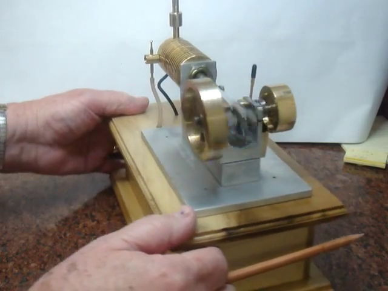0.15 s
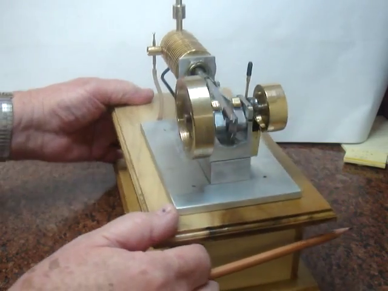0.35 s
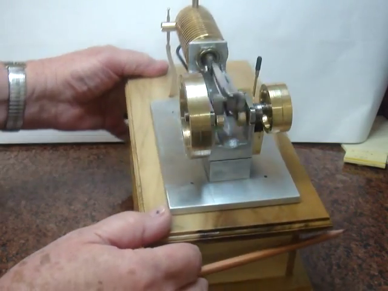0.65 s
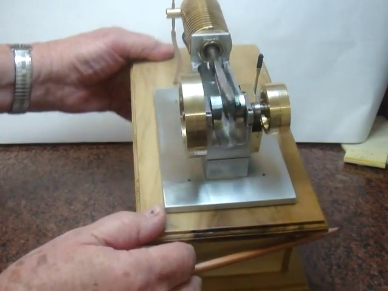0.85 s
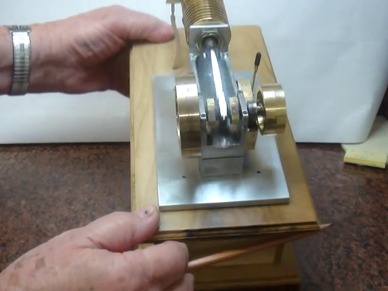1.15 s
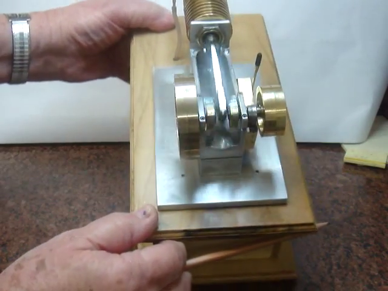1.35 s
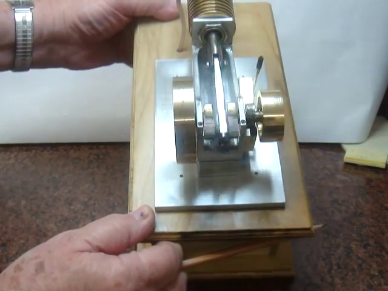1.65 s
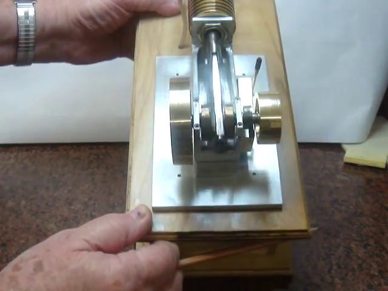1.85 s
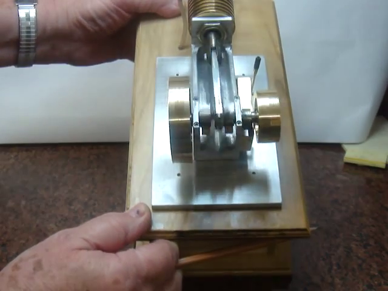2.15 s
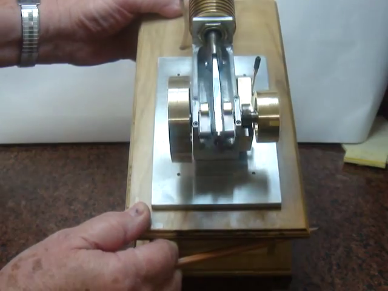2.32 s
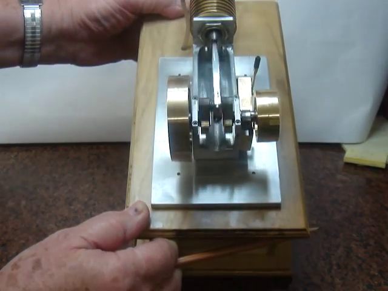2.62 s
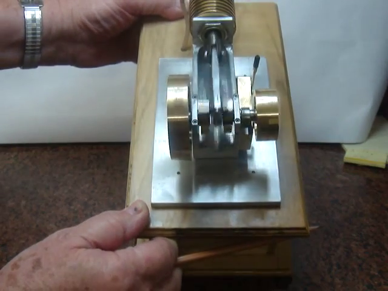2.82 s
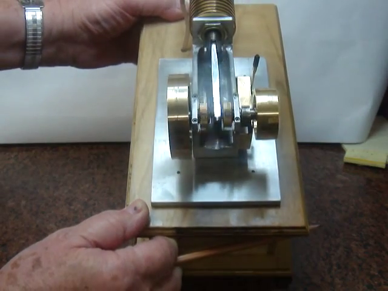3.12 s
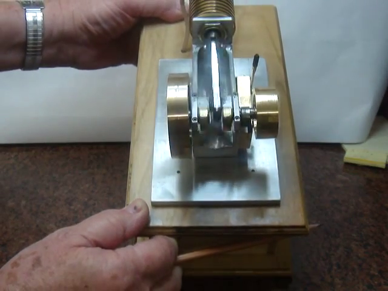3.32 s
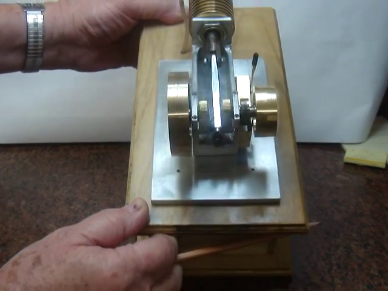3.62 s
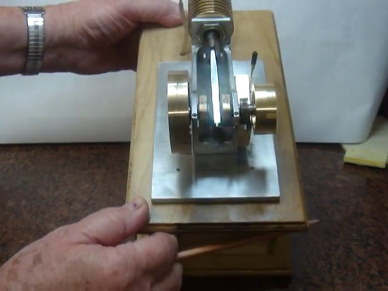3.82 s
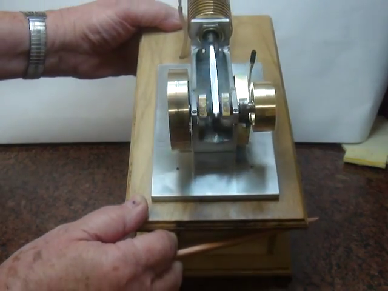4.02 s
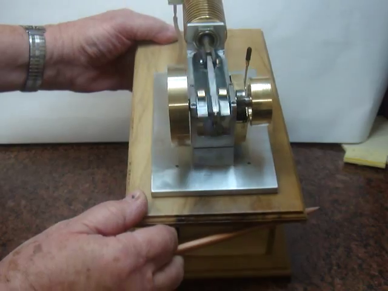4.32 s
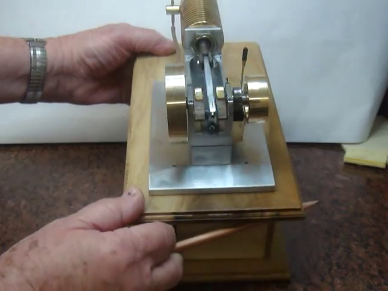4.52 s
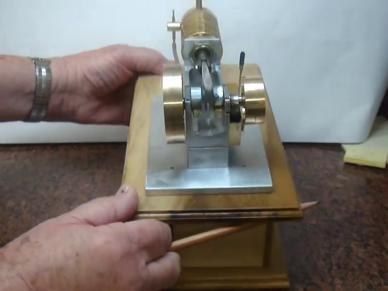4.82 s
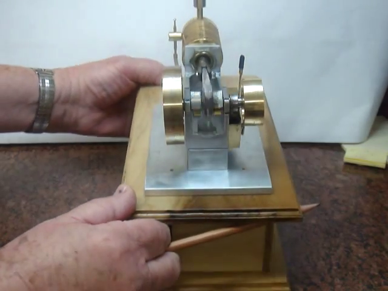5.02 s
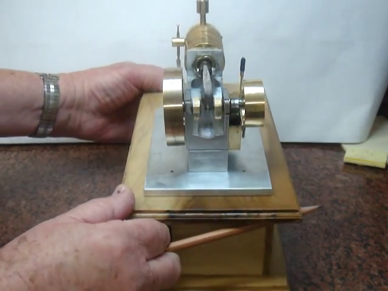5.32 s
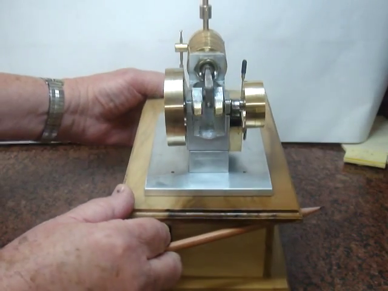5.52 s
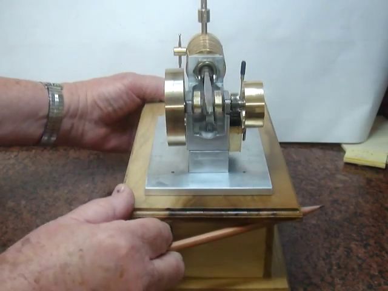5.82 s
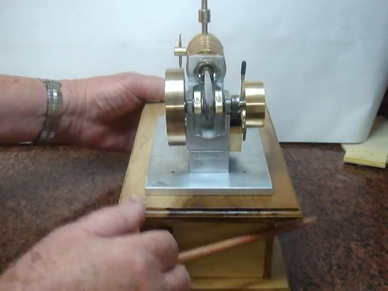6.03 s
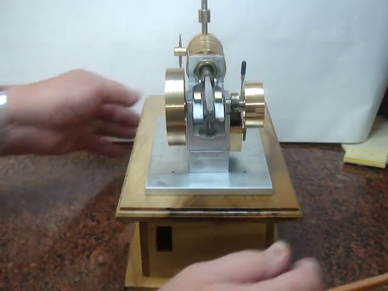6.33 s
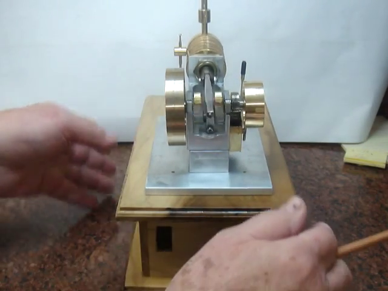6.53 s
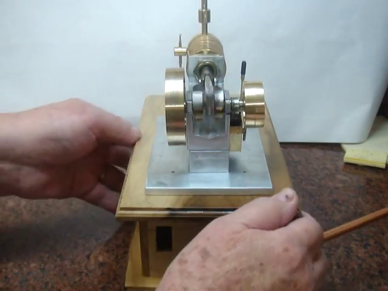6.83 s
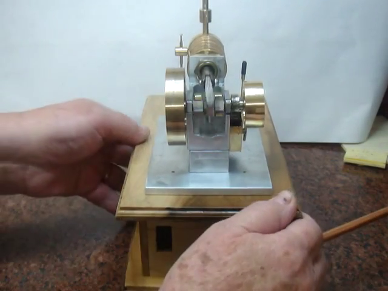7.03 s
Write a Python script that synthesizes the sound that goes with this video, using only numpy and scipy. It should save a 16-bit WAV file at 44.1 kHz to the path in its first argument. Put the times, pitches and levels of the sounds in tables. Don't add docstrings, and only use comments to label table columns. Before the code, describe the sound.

From 0 to about 7 seconds a small electromagnetic engine runs without pause on a hollow wooden box, turning every 0.22 seconds. Each turn repeats a pattern: a faint switch tick, a snap as it closes, a slack click with a woody push, a rattle and bump, then the loudest sound, a double metallic crack with a bright rebound and box knock, followed by lighter wrist and release clicks. All are short and dry, slightly uneven. At 0-1 s the box rubs softly on the table and the crack is strong. From about 1-4.3 s, tipped forward, clicks become brighter, slack looser and pin snaps clearer, with stronger wooden bumps near 1.8-2.7 s. From 4.5 s it settles back, rubbing slightly more; tiny stray knocks at 4.6 and 5.7 s. After 6.2 s it sounds duller and woodier. Low room noise and very faint hum persist; the microphone is close, with little bass.

```python
import sys
import numpy as np
from scipy import signal
from scipy.fft import rfft, irfft
from scipy.io import wavfile
from scipy.ndimage import uniform_filter1d

SR = 44100
rng = np.random.default_rng(int(sys.argv[2]) if len(sys.argv) > 2 else 0)


def amp(db):
    return 10 ** (np.asarray(db, float) / 20)


def write(x):
    x = np.atleast_2d(x).T
    wavfile.write(sys.argv[1], SR, np.round(np.clip(x, -1, 1) * 32767).astype(np.int16))

luck = rng.spawn(1)[0]


N = 315752
RING_SAMPLES = 6600
UNEVEN_DB = 0.4
SLACK_GROWS_MS = 2.8

# pitch in Hz, level in dB.
SLACK_TONE = [(700, -0.5), (1500, 1), (2300, 4.5), (3300, -3), (4200, -0.5), (5500, -13.5), (8000, -15),
              (10500, -20.5)]
# pitch in Hz, level in dB.
RELEASE_TONE = [(700, 0.5), (1500, -7), (2300, 6.5), (3300, 0), (5000, -1.5), (6200, -6), (8000, -4.5),
                (10500, -13)]


def turns(count):
    # time in seconds,
    # share of crank side shown, share tipped forward, lead of the rocking in ms, piston bump in dB.
    crank = [(0.0638, -0.035, 0.097, 45.5, -16.5), (0.4958, 0.45, 0.035, 40.5, -17),
             (0.9243, 0.86, 0.27, 34.5, -24), (1.3578, 0.88, 0.75, 18.5, -26), (1.793, 0.58, 0.66, -6, -12),
             (2.2321, 0.76, 0.78, 0.5, -14.5), (2.67, 0.7, 0.96, 4.5, -12.5),
             (3.1136, 0.72, 0.88, 13, -28.5), (3.5574, 0.87, 0.85, 17.5, -24),
             (4.0037, 0.96, 0.76, 22.5, -18), (4.4558, 0.5, 0.36, 31.5, -19.5),
             (4.903, -0.027, 0.066, 37, -28), (5.346, 0.17, 0.11, 42, -28),
             (5.7916, 0.045, 0.39, 43.5, -21), (6.2418, 0.0064, 0.37, 46.5, -23),
             (6.6946, -0.19, 0.42, 48.5, -29), (7.1476, -.4, 0.14, 46.5, -19.5)]
    rows = np.arange(len(crank))
    every_turn = np.arange(2 * len(crank) - 1) / 2
    seconds, *controls = [np.interp(every_turn, rows, column) for column in np.transpose(crank)]
    return [column[:count] for column in (seconds, np.gradient(seconds), *controls)]


def contact(name, count=32):
    contacts = {"lift": (-37, -32, 5, -7, 0.8), "close": (0.0, -23, 1, 2, -0.15),
                "ping": (21, -32, 3, -10, -3), "slack": (12.5, -26, 1, 1, .5),
                "push": (11.5, -20, -4, 1, 0), "rattle": (30, -22, -6, -6, -1.5),
                "crack": (42, -13.5, -4.5, 1.3, 0.3), "rebound": (47.5, -17.5, 5.5, -0.34, -0.45),
                "kick": (51, -19, 1, -1, 3), "wrist": (87.5, -21.5, -1.5, -4.8, 4),
                "release": (101, -23, 1.4, 2.5, 1)}
    place_ms, db, side_db, tip_db, loose_ms = contacts[name]
    seconds, turn, side, tip, _, _ = turns(count)
    late, loud = luck.standard_normal((count, 2)).T
    place = turn * place_ms / 220
    level_db = db + side_db * side + tip_db * tip + UNEVEN_DB * loud
    return seconds + place + late * loose_ms / 1000, level_db


def add(out, seconds, blows):
    for second, blow in zip(seconds, blows):
        i = max(round(second * SR), 0)
        out[i:i + RING_SAMPLES] += blow[:max(N - i, 0)]


def strike(seconds, level_db, hz, mode_db, t60, rise_ms, vary, sharp):
    t = np.arange(RING_SAMPLES) / SR
    fade = np.exp(-np.log(1000) * t / t60[:, None])
    rings = fade * np.sin(2 * np.pi * hz[:, None] * t)
    signature = rng.choice([-1, 1], len(hz))
    fresh = vary * rng.standard_normal((len(seconds), len(hz)))
    strength = amp(mode_db) * (sharp + signature + fresh)
    blows = (strength @ rings) * (1 - np.exp(-t * 1000 / rise_ms))
    peak = np.sqrt(2 * uniform_filter1d(blows ** 2, size=64).max(axis=1))
    out = np.zeros(N)
    add(out, seconds, blows * (amp(level_db) / peak)[:, None])
    return out


def at_hz(points, hz):
    point_hz, point_db = np.array(points).T[:2]
    return np.interp(np.log(hz), np.log(point_hz), point_db)


def metal(seconds, level_db, colour, fast, slow, slow_db, rise_ms=0.24, low_hz=1100, sharp=0.3):
    # pitch in Hz, width in Hz, level in dB.
    frame = [(1456, 37, 2.5), (2180, 64, 5), (2250, 280, 3.5), (2733, 190, -5), (3136, 180, 6),
             (3433, 52, 11.5), (4107, 150, 2.5), (5100, 82, 6), (5640, 190, 5.5), (7930, 120, -4.5),
             (7800, 180, 7), (9700, 180, 4), (11200, 320, 9)]
    # time in seconds, brightness in dB per octave,
    # level in dB from the base plate facing us.
    facing = [(0.0, -1.2, -1.5), (1.0, -0.37, -1.5), (4.3, 0.04, -1.5), (5.0, -0.2, 1), (6.2, -0.76, 1.5),
              (7.16, -1.2, 4)]
    hz = rng.uniform(502.3, 11000, (2, 240))
    lift_db = sum(db / (1 + (2 * (hz - f) / width) ** 2) for f, width, db in frame)
    mode_db = (at_hz(colour, hz) + lift_db + [[0], [slow_db]]).ravel()
    t60 = np.array([[fast], [slow]]) * (3000 / hz) ** 0.07
    when, bright_db, plate_db = np.transpose(facing)
    octaves = np.log2(hz.ravel() / 4000)
    plate_band = np.exp(-((octaves + 0.75) / 0.3) ** 2)
    mode_db = mode_db + np.outer(np.interp(seconds, when, bright_db), octaves)
    mode_db = mode_db + np.outer(np.interp(seconds, when, plate_db), plate_band)
    x = strike(seconds, level_db, hz.ravel(), mode_db, t60.ravel(), rise_ms, vary=0.9, sharp=sharp)
    return signal.sosfilt(signal.butter(3, low_hz, "high", fs=SR, output="sos"), x)


def box(seconds, level_db, hard_db, damping, rise_ms, vary):
    # pitch in Hz, level in dB, 60 dB fade in seconds.
    modes = [(303, -4.5, 0.09), (328.4, -1.5, 0.062), (353, 7, 0.085), (383, -3, 0.061), (437.6, -6, 0.053),
             (469, -7.5, 0.056), (506, -13.5, 0.08), (590, -14.5, 0.063), (643, -13, 0.084),
             (761, -12, 0.046), (800, -10.5, 0.06), (896, -17, 0.058), (1039, -10, .06), (1152, -15, 0.11),
             (1250, -16.5, 0.064), (1380, -13, .07), (1500, -16, 0.058), (1645, -16.5, 0.069),
             (1860, -19.5, 0.036)]
    # time in seconds, tilt in dB per quarter octave.
    grip = [(0.0, 0.24), (0.8, -0.36), (1.3, -3), (2.0, 0.56), (2.8, -1.5), (3.6, -0.11), (4.7, -3),
            (5.5, 0.27), (6.3, 3), (7.16, 4)]
    hz, mode_db, t60 = np.transpose(modes)
    octaves = np.log2(hz / 350)
    mode_db = mode_db + hard_db * octaves
    mode_db = mode_db + np.outer(np.interp(seconds, *np.transpose(grip)), 4 * np.minimum(octaves, .4))
    return strike(seconds, level_db, hz, mode_db, t60 * damping, rise_ms, vary, sharp=1.37)


def stop():
    # pitch in Hz, level in dB.
    crack_tone = [(700, -5), (1500, 2.5), (2300, 2), (3300, -3), (4600, -3.5), (6200, -13), (7800, 0),
                  (10500, -11)]
    rebound_tone = [(900, -27), (1500, -19), (2300, -23.5), (3300, -13), (5000, -4), (6200, -3.5),
                    (8000, 0), (10500, 5.5)]
    s, db = contact("crack")
    crack = metal(s, db + 3.5, crack_tone, fast=.013, slow=0.19, slow_db=-21, rise_ms=0.15, low_hz=874,
                  sharp=0.45)
    second = metal(s + .0018, db - 2.5, crack_tone, fast=.03, slow=0.15, slow_db=-12.5, rise_ms=0.27,
                   low_hz=920)
    rebound = metal(*contact("rebound"), rebound_tone, fast=.009, slow=0.12, slow_db=-18, rise_ms=0.12,
                    sharp=0.7)
    knock = box(s, db - 12.5, hard_db=6.0, damping=1.64, rise_ms=.8, vary=0.91)
    kick = box(*contact("kick"), hard_db=-2.5, damping=1.0, rise_ms=1.98, vary=0.62)
    return crack + second + rebound + knock + kick


def pull():
    # pitch in Hz, level in dB.
    rattle_tone = [(900, -2), (1500, -7), (2300, -2), (3300, -8), (4200, -1), (6200, -21), (8000, -12),
                   (10500, -13)]
    *_, tip, _, bump_db = turns(count=32)
    play = tip * SLACK_GROWS_MS / 1000
    s, db = contact("slack")
    push_s, push_db = contact("push")
    rattle_s, rattle_db = contact("rattle")
    s = s + play
    late, loud = luck.standard_normal((len(s), 2)).T
    slack = metal(s, db, SLACK_TONE, fast=0.013, slow=0.14, slow_db=-10.5, low_hz=600)
    push = box(push_s + play, push_db, hard_db=2.5, damping=1.0, rise_ms=2.5, vary=0.68)
    bump_s = s + (13.0 + 2.0 * late) / 1000
    bump = box(bump_s, bump_db + UNEVEN_DB * loud, hard_db=9.0, damping=0.65, rise_ms=0.93, vary=0.86)
    knocks = (s[:, None] + rng.uniform(0.00394, .045, (len(s), 5))).ravel()
    slide = box(knocks, np.repeat(push_db, 5) - 10.0, hard_db=6.0, damping=0.78, rise_ms=0.31, vary=2.2)
    rattle = metal(rattle_s + play, rattle_db, rattle_tone, fast=0.023, slow=0.095, slow_db=-6, rise_ms=0.3)
    return slack + push + bump + slide + rattle


def switch():
    # pitch in Hz, level in dB.
    lift_tone = [(900, -23), (1500, -16), (2300, -5), (3300, -2.5), (5000, -12), (6200, -14), (8000, -6),
                 (10500, -10)]
    close_tone = [(900, -25), (1500, -2.5), (2300, -2), (3400, 2), (5000, -7), (6200, -13.5), (8000, 2),
                  (10500, -1.5)]
    ping_tone = [(1500, -22), (3300, -11), (6200, -11), (7500, 3), (9000, -25), (10500, 0)]
    tick = metal(*contact("lift", count=33), lift_tone, fast=0.0079, slow=0.11, slow_db=-10.5, rise_ms=0.29)
    close = metal(*contact("close", count=33), close_tone, fast=0.02, slow=0.073, slow_db=-7.0,
                  rise_ms=0.43, low_hz=1470)
    ping = metal(*contact("ping", count=33), ping_tone, fast=0.011, slow=0.052, slow_db=0, low_hz=2960)
    return tick + close + ping


def back_stroke():
    # pitch in Hz, level in dB.
    wrist_tone = [(900, 12), (1500, -7.5), (2300, 0), (3300, -8), (5000, -2.5), (6200, -9), (8000, 0),
                  (10500, -7.5)]
    # time in seconds, level in dB.
    stray = [
        (4.6436, -33),
        (5.7009, -32.5),
    ]
    wrist = metal(*contact("wrist"), wrist_tone, fast=0.047, slow=0.22, slow_db=-7.5, rise_ms=0.75,
                  low_hz=1380)
    s, db = contact("release")
    release = metal(s, db, RELEASE_TONE, fast=0.02, slow=0.11, slow_db=-17, rise_ms=0.55)
    touch = box(s, db - 11.0, hard_db=8.5, damping=1.3, rise_ms=1.4, vary=1.0)
    stray_s, stray_db = np.transpose(stray)
    loose = metal(stray_s, stray_db - .3, SLACK_TONE, fast=0.033, slow=0.087, slow_db=-8)
    return wrist + release + touch + loose


def thump():
    s, _, _, _, lead_ms, _ = turns(count=33)
    meeting = np.exp(-(lead_ms / 7.0) ** 2)
    db = -26 - 7 * meeting + UNEVEN_DB * luck.standard_normal(len(s))
    return box(s - lead_ms / 1000 - .004, db, hard_db=-9.0, damping=0.6, rise_ms=3.0, vary=0.3)


def snap():
    # pitch in Hz, level in dB.
    snap_tone = [(900, -29), (2300, -16.5), (3300, -7), (4100, 7.5), (5000, -12), (6200, -19.5),
                 (10500, -21.5)]
    s, _ = contact("slack")
    tip = turns(count=32)[3]
    late_s = s + tip * SLACK_GROWS_MS / 1000
    return metal(late_s, -35 + 9 * tip, snap_tone, fast=.014, slow=.05, slow_db=-17, low_hz=2500)


def chatter():
    s, turn, _, tip, _, _ = turns(count=32)
    place = luck.uniform(.05, 0.42, (len(s), 6))
    loud = luck.standard_normal((len(s), 6))
    db = -37 - 4 * tip[:, None] + 3 * loud
    ticks = s[:, None] + turn[:, None] * place
    return metal(ticks.ravel(), db.ravel(), RELEASE_TONE, fast=.015, slow=.07, slow_db=-11.5, low_hz=900)


def hiss(spectrum, grain_db):
    grain = uniform_filter1d(rng.standard_normal(N), size=200) * np.sqrt(200)
    hz = np.arange(1, N // 2 + 2) * SR / N
    grainy = rng.standard_normal(N) * amp(grain_db * grain)
    x = irfft(rfft(grainy) * amp(at_hz(spectrum, hz)), N)
    return x / x.std()


def background():
    # pitch in Hz, level in dB per Hz.
    room_tone = [(24, -63), (40, -27), (202, -3.5), (356, 6), (611, -1), (1050, -4), (1760, -6.5),
                 (2230, -7.5), (2560, -70), (3170, -17), (6410, -19.5), (8100, -11), (11000, -23),
                 (14300, -7), (22000, -120)]
    slide_tone = [(400, -13.5), (900, 5), (1800, 2.5), (3500, 1), (5500, -3.5), (8000, -17), (11000, -8.5)]
    # time in seconds, level in dB.
    hands = [(0.0, -40.5), (0.75, -45.5), (1.45, -50.5), (4.35, -51.5), (4.7, -47), (5.5, -48),
             (6.4, -48.5), (7.16, -45.5)]
    # pitch in Hz, rms level in dB.
    hum_tones = [
        (60, -78.5),
        (120, -72.5),
    ]
    t = np.arange(N) / SR
    s, _, _, tip, _, _ = turns(count=33)
    room_db = -49 + 2.5 * np.interp(t, s, tip)
    room = amp(room_db) * hiss(room_tone, grain_db=-3.5)
    slide = amp(np.interp(t, *np.transpose(hands))) * hiss(slide_tone, grain_db=1.0)
    hum = sum(np.sqrt(2) * amp(db) * np.sin(2 * np.pi * hz * t) for hz, db in hum_tones)
    return room + slide + hum


def scene():
    engine = switch() + pull() + stop() + back_stroke() + thump() + snap() + chatter()
    heard = signal.sosfilt(signal.butter(6, 315, "high", fs=SR, output="sos"), engine)
    thud = signal.sosfilt(signal.butter(2, 220, fs=SR, output="sos"), engine)
    return (heard + amp(-15) * thud + background())[None]


def roll_off(x):
    return signal.sosfilt(signal.butter(12, 12330, fs=SR, output="sos"), x)


def record(dry):
    edge = signal.sosfilt(signal.butter(40, 11000, fs=SR, output="sos"), dry)
    return roll_off(edge + 0.043 * edge ** 2)


dry = scene()
out = record(dry)
write(out)
```